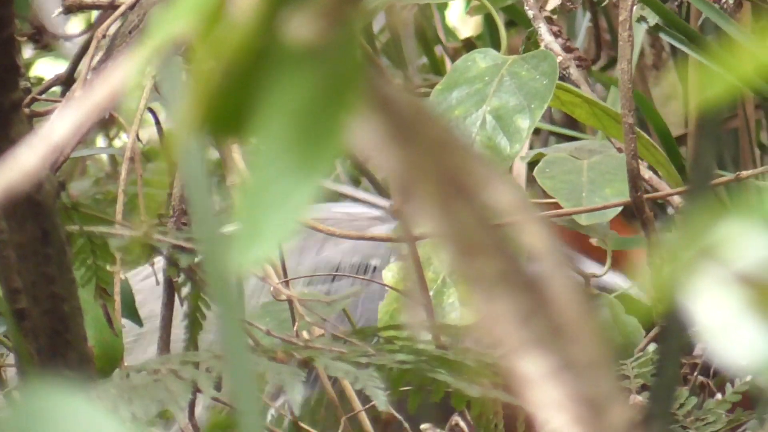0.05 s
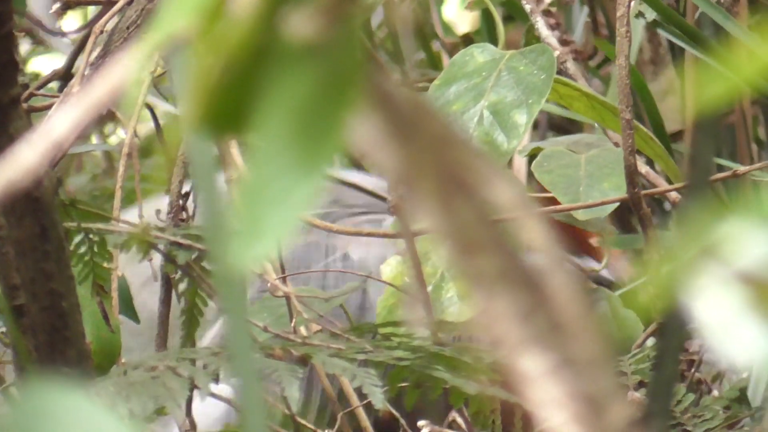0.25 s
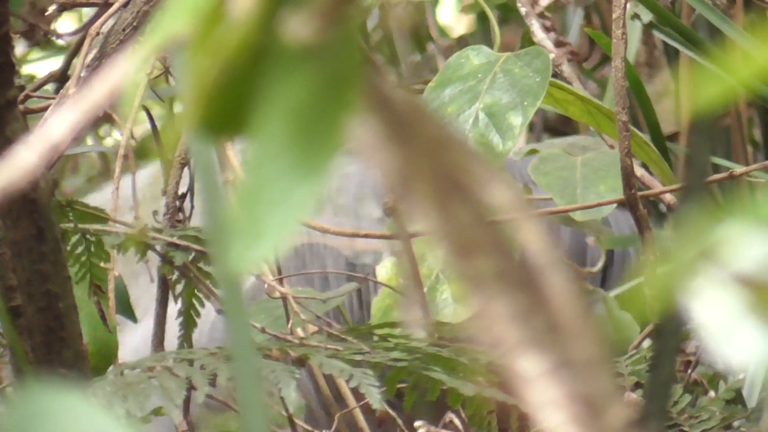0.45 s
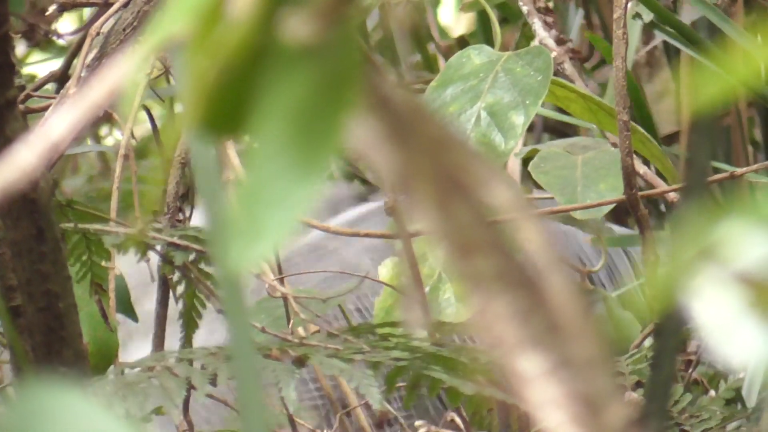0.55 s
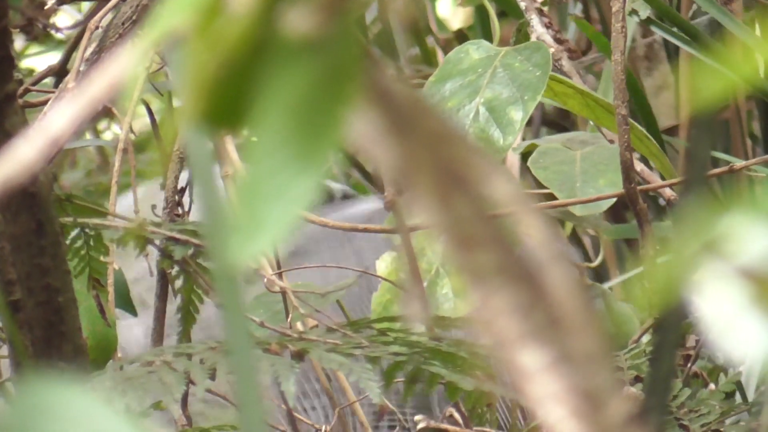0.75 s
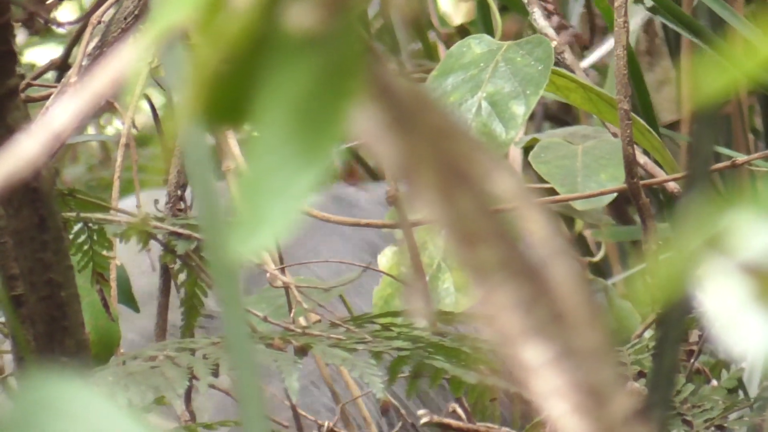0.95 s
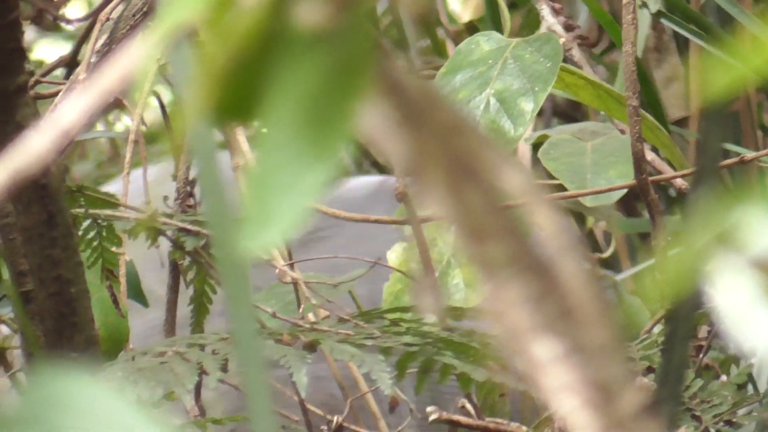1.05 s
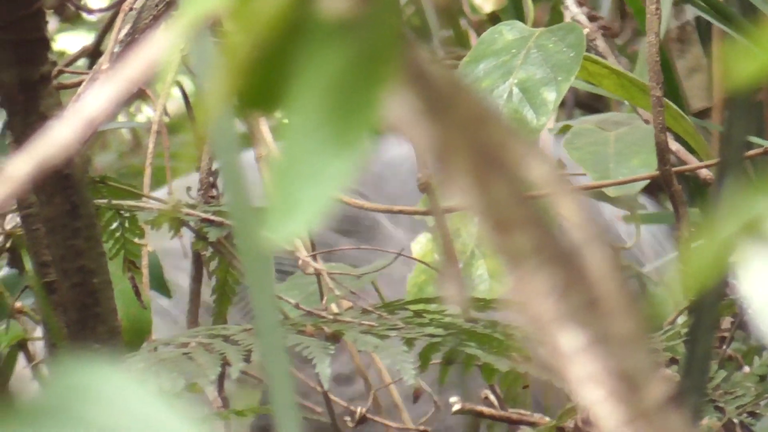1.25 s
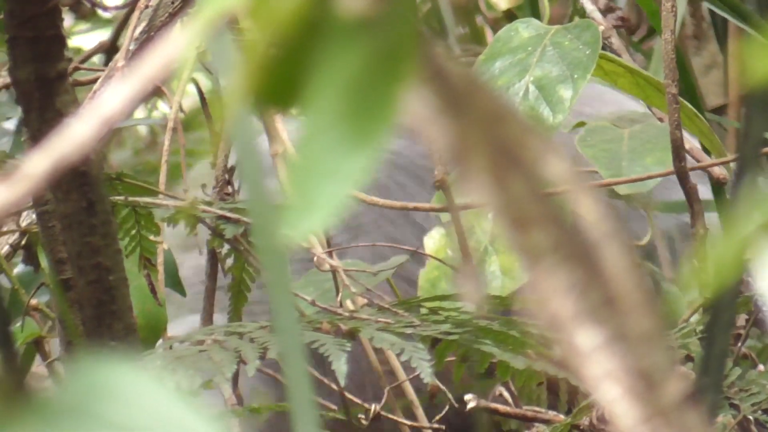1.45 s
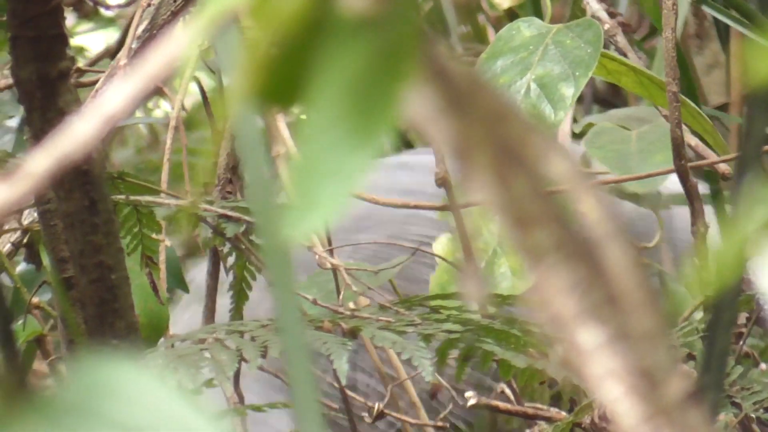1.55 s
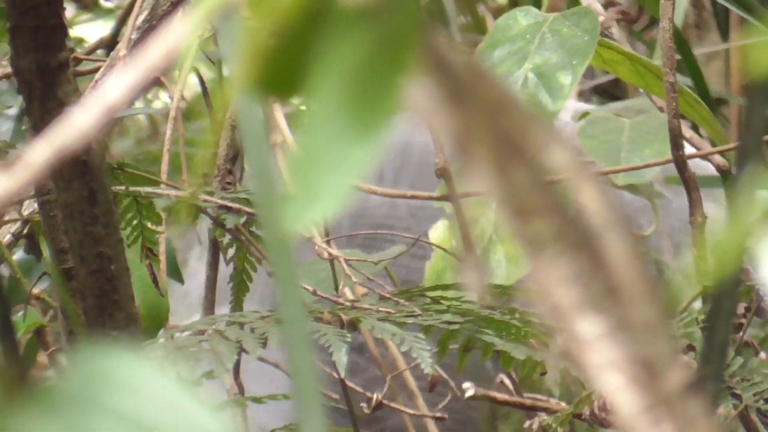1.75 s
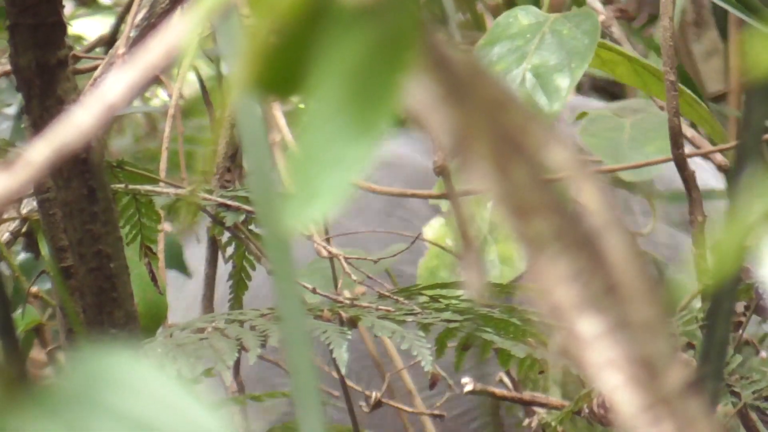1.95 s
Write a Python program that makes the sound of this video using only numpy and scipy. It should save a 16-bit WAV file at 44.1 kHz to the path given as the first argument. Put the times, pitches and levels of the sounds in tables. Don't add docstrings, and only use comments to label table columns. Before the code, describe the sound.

A bird whistles a sliding two-voiced phrase, then rasps harshly in hushed, leafy forest undergrowth

```python
import sys
import numpy as np
from scipy import signal
from scipy.io import wavfile
from scipy.ndimage import uniform_filter1d

SR = 44100
rng = np.random.default_rng(int(sys.argv[2]) if len(sys.argv) > 2 else 0)


def decibels_to_gain(level_db):
    exponent = np.asarray(level_db, float) / 20
    return 10 ** exponent


def unload_audio(sound):
    columns = np.transpose(np.atleast_2d(sound))
    steps = np.round(np.clip(columns, -1, 1) * 32767)
    wavfile.write(sys.argv[1], SR, steps.astype(np.int16))


N = 88200
T = np.arange(N) / SR

# (frequency [Hz], level per Hz [dB])
HUSH_SPECTRUM = [(60, -6), (260, 3), (900, -6.5), (2200, -11.5), (3000, -26), (4500, -11.5), (6300, -22.5),
                 (10500, -9.5)]
# (frequency [Hz], correlation [0-1])
HUSH_LIKENESS = [(100, .03), (400, 0.05), (12000, 0.17)]
# (time [s], level [dB])
BREEZE = [(0, -0.5), (.75, 4), (1, -2.5), (1.36, -3), (1.45, -3.5), (1.72, 1.5), (1.77, 10.5), (1.84, 2.5),
          (1.93, 6), (2, 4.5)]
# (time [s], peak level [dB])
TICKS = [(1.4436, -42), (1.4835, -43), (1.5239, -43), (1.5444, -43), (1.6037, -46), (1.6237, -47),
         (1.6437, -47), (1.6636, -44), (1.6836, -42), (1.7439, -43), (1.7644, -44), (1.804, -46),
         (1.824, -45), (1.8692, -41), (1.924, -41), (1.944, -46), (1.9839, -43)]
# (frequency [Hz], level [dB], 60 dB decay [s])
SHELL_MODES = [(1400, 0, .03), (2150, 0, .02), (3700, -3, .012), (6000, 1, .004)]
# (time [s], pitch [Hz], level [dB])
FAR_CALLS = [
    [(1.4, 2220, -68), (1.476, 2224, -59), (1.574, 2219, -52), (1.604, 2222, -55), (1.612, 2220, -66),
     (1.66, 2210, -68)],
    [(1.25, 3800, -64), (1.29, 4150, -59), (1.335, 4250, -66), (1.37, 4330, -59), (1.43, 4370, -57),
     (1.515, 4380, -68), (1.532, 4560, -53), (1.58, 4620, -62), (1.67, 4600, -70)],
    [(1.385, 4500, -64), (1.415, 5220, -56), (1.47, 5200, -57), (1.52, 4950, -64)],
    [(1.535, 4600, -60), (1.565, 5400, -58), (1.6, 5500, -57), (1.65, 5500, -60), (1.72, 5480, -68)],
]
FAR_ECHO_DB = [-8, 4, 3, 3]
FAR_WAVER = [.0002, .0045, .005, .003]

# (frequency [Hz], width [Hz], level [dB])
CHEST_TAIL = [(1200, 440, -4.5), (2240, 184, 0), (2600, 570, -1)]
CHEST = [(512, 200, 0), (1072, 217, 2), (1536, 145, -2.5), (2160, 260, -6)]
CHEST_LATE = [(694, 200, 11.5), (1300, 1700, 1.6), (2370, 1200, 1.7)]
CHEST_LEAK = [(400, 450, 0), (920, 960, 2), (2090, 480, 1)]
BEAK = [(4070, 760, -1), (5465, 270, 3.5), (7340, 420, -6), (8930, 290, -9), (11300, 1100, -11.5)]
BEAK_LATE = [(2600, 1160, -1.5), (4060, 650, -4), (5850, 450, 2), (8720, 710, -5.5), (11260, 900, -7.5)]
BEAK_LEAK = [(4300, 500, 0.5), (8460, 1100, -8), (11500, 890, -6)]
# (time [s], pulse rate [Hz], chest level [dB], beak level [dB])
RASP_TAIL = [(0, 110, -24, -43), (.012, 165, -31, -53), (.035, 150, -36.5, -55), (.08, 150, -54, -76)]
RASP = [(.7625, 121.8, -39.5, -49), (.79, 121.7, -30.5, -49.5), (.826, 111.5, -33, -37.5),
        (.87, 125.7, -33, -34), (.912, 138.2, -34, -35.5), (.931, 150.5, -40, -42), (.937, 153, -49.5, -48),
        (.99, 154.6, -40.5, -64)]
RASP_LATE = [(1.098, 162, -46, -42.5), (1.135, 166.4, -48, -36.5), (1.152, 149, -54, -34),
             (1.178, 139.4, -39, -35.5), (1.2, 130.7, -40, -44), (1.24, 128, -42, -48.5),
             (1.29, 125, -44, -59), (1.325, 119, -52, -77)]
LEAK_ENTRY = [(.19, 196, -47.5, -76), (.24, 225, -41.5, -54), (.28, 160, -53.5, -98)]
LEAK_FALL = [(.66, 205, -82, -61), (.73, 207, -70, -40), (.77, 206, -61, -61)]
LEAK_LEAP = [(.3, 197, -84, -62), (.47, 202, -84, -55.5), (.53, 196, -94, -46.5), (.58, 202, -91, -60.5)]
HARSH = [(RASP_TAIL, CHEST_TAIL, BEAK, .55, .7), (RASP, CHEST, BEAK, .52, .65),
         (RASP_LATE, CHEST_LATE, BEAK_LATE, .96, 2.5), (LEAK_ENTRY, CHEST_LEAK, BEAK_LEAK, .95, 1.5),
         (LEAK_FALL, CHEST_LEAK, BEAK_LEAK, .97, 3), (LEAK_LEAP, CHEST_LEAK, BEAK_LEAK, .98, 3)]

# (frequency [Hz], level [dB])
MOUTH = [(3300, 0), (3650, 10), (4100, -9), (5450, 5.5), (6100, -15), (7250, -5), (7550, 2.5)]
# (time [s], pitch [Hz], level [dB])
LOW_ENTRY = [(.17, 686, -51), (.182, 881, -43), (.193, 1298, -32), (.234, 1259, -30), (.256, 1426, -31.5),
             (.27, 1570, -40)]
RISE = [(.175, 1460, -41.5), (.192, 2027, -41.5), (.26, 1749, -36), (.336, 1821, -23.5), (.358, 1850, -29),
        (.424, 1986, -17), (.482, 2055, -14), (.49, 2213, -16.5), (.495, 2536, -42)]
LEAP = [(.494, 2650, -56), (.503, 3945, -32), (.511, 4700, -50), (.518, 5190, -33), (.527, 5605, -27.5),
        (.556, 5486, -22), (.565, 5343, -26.5), (.57, 5450, -28), (.578, 5500, -48.5)]
FALL = [(.626, 2795, -50), (.643, 2596, -28), (.673, 2353, -16.5), (.693, 2116, -12), (.703, 2034, -9),
        (.715, 1961, -16.5), (.722, 1985, -17.5), (.733, 1875, -23.5)]
DIP = [(.728, 1920, -33), (.733, 1556, -29), (.738, 1247, -23), (.744, 1012, -29), (.755, 1198, -23),
       (.762, 1288, -19), (.768, 1667, -27), (.775, 1704, -45)]
PICKUP = [(1.07, 686, -64), (1.079, 696, -36.5), (1.09, 791, -37.5), (1.095, 1240, -37)]
ARCH = [(1.095, 3760, -54), (1.101, 5016, -48), (1.109, 5550, -30), (1.117, 5850, -36), (1.126, 6020, -28),
        (1.141, 5950, -29), (1.15, 3260, -41.5), (1.159, 2600, -36.5), (1.175, 2290, -41)]
UNDER = [(1.116, 660, -66), (1.124, 668, -53), (1.135, 668, -53), (1.14, 660, -66)]
# (note, overtones 2, 3, .. re its peak [dB], how closely they follow its level [ratio])
SONG = [(LOW_ENTRY, [-35, -31, -60, -60, -60, -60, -60, -29], 1.), (RISE, [-36, -40, -34, -44, -42, -42],
        .55), (LEAP, [-25], .9), (FALL, [-25, -60, -60, -48, -46, -44], 2.05), (DIP, [-30], 1.),
        (PICKUP, [-12], 1.5), (ARCH, [-13], 2.), (UNDER, [-14, 7, -6, 8, 15], 1.)]

ECHO_DB = -12


def unit(x):
    return x / np.sqrt(np.mean(x ** 2))


def walk(rate):
    hold = int(SR / rate)
    steps = np.repeat(rng.standard_normal(N // hold + 1), hold)
    return unit(uniform_filter1d(uniform_filter1d(steps, hold), hold)[:N])


def ring(x, hz, width_hz):
    return signal.lfilter(*signal.iirpeak(hz, hz / width_hz, fs=SR), x)


def ring_twice(x, hz, width_hz):
    return ring(ring(x, hz, width_hz), hz, width_hz)


def stereo(mid, side):
    return mid + side * np.array([[1], [-1]])


def pan(db):
    return decibels_to_gain(np.array([[db], [-db]]) / 2)


def decay(t, t60):
    return np.exp(-np.log(1000) * t / t60)


def controls(rows):
    rows = np.array(rows, float)
    columns = [uniform_filter1d(np.interp(T, rows[:, 0], c), size=120) for c in rows.T[1:]]
    is_open = 1. * ((T >= rows[0, 0]) & (T < rows[-1, 0]))
    return columns, uniform_filter1d(is_open, size=120)


def forest():
    level_db, hiss_hz, top_slope_db = -45.5, 5970, -23
    spectrum_hz, spectrum_db = np.array(HUSH_SPECTRUM).T
    like_hz, like = np.array(HUSH_LIKENESS).T
    breeze_db = np.interp(T, *np.array(BREEZE).T)
    hush = 0
    for hz in 30 * 2 ** np.arange(0, 9.1, 1 / 3):
        mid, side = (unit(ring_twice(n, hz, hz / 3)) for n in rng.standard_normal((2, N)))
        alike = np.clip(np.interp(np.log(hz), np.log(like_hz), like), 0, 1)
        db = np.interp(np.log(hz), np.log(spectrum_hz), spectrum_db) + 10 * np.log10(hz)
        db = db + top_slope_db * max(np.log2(hz / spectrum_hz[-1]), 0)
        db = db + 2.9 * walk(6.62) + breeze_db * hz ** 2 / (hz ** 2 + hiss_hz ** 2)
        hush = hush + decibels_to_gain(db) * stereo(np.sqrt(1 + alike) * mid, np.sqrt(1 - alike) * side)
    hush = hush - ring(hush, 1940, 130)
    return unit(hush) * decibels_to_gain(level_db) * pan(-1)


def motor():
    hits = np.zeros(N)
    for s, db in TICKS:
        hits[int(s * SR)] = decibels_to_gain(db - 4)
    t = T[:2000]
    shell = sum(decibels_to_gain(db) * decay(t, t60) * np.sin(2 * np.pi * hz * t) for hz, db, t60 in SHELL_MODES)
    return np.convolve(hits, shell)[:N]


def far_birds():
    return [whistle(rows, [], waver=w, per_s=500) for rows, w in zip(FAR_CALLS, FAR_WAVER)]


def leaves(x):
    early_t60_s, late_db, late_t60_s = .33, -31, 1.1
    alike, dull_hz, sway_db = .1, 9200, 5.5
    t = T[:SR]
    mid, side = rng.standard_normal((2, SR))
    wash = stereo(np.sqrt((1 + alike) / 2) * mid, np.sqrt((1 - alike) / 2) * side)

    def fade(t60):
        return decay(t, t60) / np.sqrt(t60 * SR / np.log(1000) / 2)

    onset = np.clip(t / .006, 0, 1)
    wash = wash * (decibels_to_gain(ECHO_DB) * fade(early_t60_s) + decibels_to_gain(late_db) * fade(late_t60_s)) * onset
    wash = signal.lfilter(*signal.butter(1, dull_hz, fs=SR), wash)
    swaying = x[None] * decibels_to_gain(sway_db * walk(150))
    return signal.fftconvolve(swaying, wash, axes=1)[:, :N]


def windpipe(pulses, puffs, modes, air):
    drive = (1 - air) * pulses + air * puffs
    pipe = 0
    for k, (hz, width_hz, db) in enumerate(modes):
        pipe = pipe + (-1) ** (k + 1) * decibels_to_gain(db) * unit(ring_twice(drive, hz, 2 * width_hz))
    return unit(pipe)


def rasp(rows, chest, beak, air, puff):
    jitter, pulse_db, beak_air = .012, 1.2, .74
    (rate, chest_db, beak_db), gate = controls(rows)
    cycles = np.cumsum((T >= rows[0][0]) * rate * (1 + jitter * walk(60))) / SR
    size = decibels_to_gain(pulse_db * rng.standard_normal(N))[cycles.astype(int)]
    pulses = unit(np.diff(np.floor(cycles), prepend=0) * size)
    puffs = unit(size * np.exp(-(cycles % 1) / puff) * rng.standard_normal(N))
    low = decibels_to_gain(chest_db) * windpipe(pulses, puffs, chest, air)
    high = decibels_to_gain(beak_db) * windpipe(pulses, puffs, beak, max(air, beak_air))
    return gate * (low + high)


def whistle(rows, overtones_db, follow=1, waver=.003, per_s=140):
    firm_db, shake_per_db, flutter_db = -24, .35, .8
    overtone_waver, overtone_blur_db = .0025, 3.5
    (hz, db), gate = controls(rows)
    peak_db = max(r[2] for r in rows)
    shake = 1 + shake_per_db * np.clip(firm_db - db, 0, 12)
    phase = 2 * np.pi * np.cumsum(hz * (1 + shake * waver * walk(per_s))) / SR
    loose = phase + 2 * np.pi * np.cumsum(hz * overtone_waver * walk(600)) / SR
    over = 0
    for k, overtone_db in enumerate(overtones_db, start=2):
        mouth_db = np.interp(k * hz, *np.array(MOUTH).T)
        over = over + decibels_to_gain(overtone_db + mouth_db + overtone_blur_db * walk(80.9)) * np.sin(k * loose)
    ends = np.clip((db - peak_db + 30) / 10, 0, 1)
    flutter = flutter_db * np.sqrt(shake) * (walk(40) + walk(200))
    tone = decibels_to_gain(db + flutter) * np.sin(phase)
    return np.sqrt(2) * gate * (tone + ends * decibels_to_gain(peak_db + follow * (db - peak_db)) * over)


def lyrebird():
    return sum(rasp(*r) for r in HARSH) + sum(whistle(*note) for note in SONG)


def scene():
    far = far_birds()
    bird = lyrebird()
    far_into_leaves = sum(decibels_to_gain(db - ECHO_DB) * call for db, call in zip(FAR_ECHO_DB, far))
    echo = leaves(bird + far_into_leaves)
    return forest() + motor() + echo + (bird + sum(far)) * pan(-.8)


def low_pass(x):
    return signal.sosfilt(signal.butter(12, 15620, fs=SR, output="sos"), x)


def record(dry):
    low_cut = signal.butter(3, 54.5, "high", fs=SR, output="sos")
    top_cut = signal.ellip(8, .2, 70, 15550, fs=SR, output="sos")
    mix = signal.sosfilt(top_cut, signal.sosfilt(low_cut, dry))
    return low_pass(mix)


dry = scene()
out = record(dry)
unload_audio(out)
```